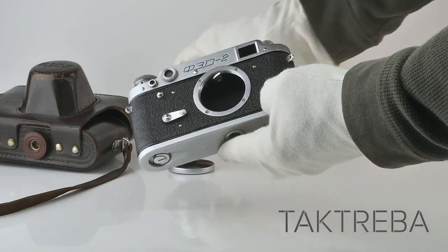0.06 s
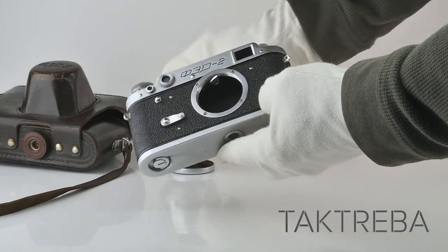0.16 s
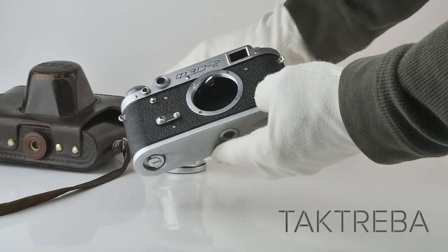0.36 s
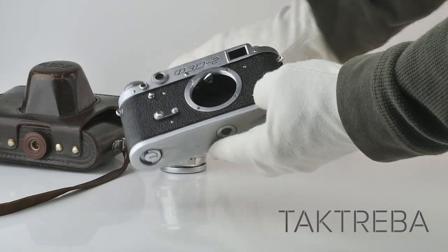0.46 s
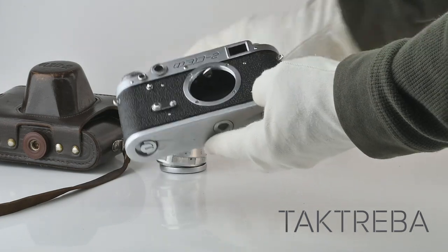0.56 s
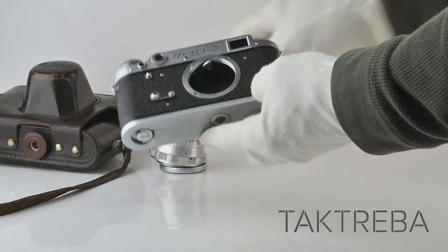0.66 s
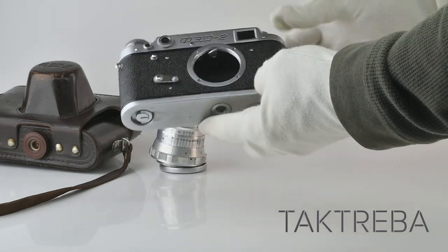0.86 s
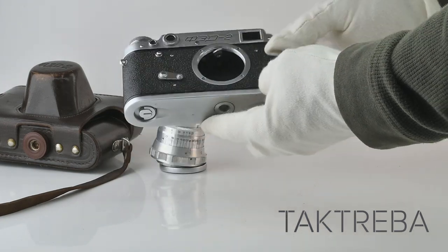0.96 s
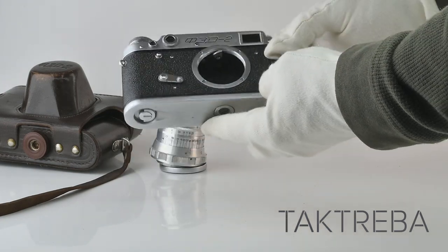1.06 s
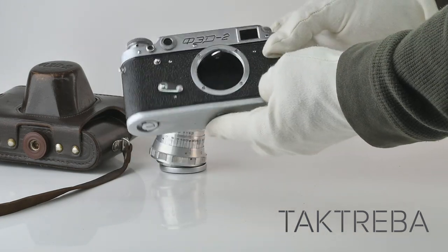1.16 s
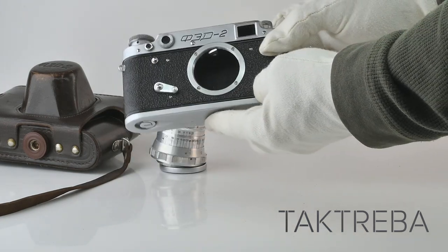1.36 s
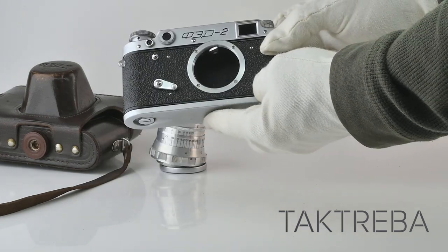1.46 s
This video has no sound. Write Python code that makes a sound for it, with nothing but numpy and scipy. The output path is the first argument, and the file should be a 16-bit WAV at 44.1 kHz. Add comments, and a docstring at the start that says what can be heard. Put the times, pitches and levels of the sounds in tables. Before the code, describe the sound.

One brief, light knock sounds near the start as a handled camera bumps a tabletop, with a slight metallic ring that dies at once. Afterwards only a faint, steady hiss remains in the quiet room.

```python
"""In a small quiet room, a metal camera body held in gloved hands knocks once against a table.
A brief scrape leads into a quick run of contacts. Each impulse excites the damped normal modes of
the table top (a thump) and of the metal shell (a ring, which the glove mutes); the hardest one cracks.
Beneath lie faint low swells from the hands and a hiss with wavering resonances, a fast treble
flutter and a thin whistle that comes and goes."""
import sys
import numpy as np
from scipy import signal
from scipy.fft import rfft, irfft
from scipy.io import wavfile
from scipy.ndimage import map_coordinates

SR = 44100
rng = np.random.default_rng(int(sys.argv[2]) if len(sys.argv) > 2 else 0)


def dump(signal):
    """Clip the signal to [-1, 1] and save it as 16-bit WAV at the path in sys.argv[1]."""
    limited = np.clip(np.atleast_2d(signal).T, -1, 1)
    pcm = np.round(limited * 32767).astype(np.int16)
    wavfile.write(sys.argv[1], SR, pcm)


N = 66150


def undb(db):
    """Amplitude ratio of a level in decibels."""
    return 10 ** (np.asarray(db) / 20)


def unit(x):
    """Normalisation to unit rms."""
    return x / np.sqrt(np.mean(x ** 2))


def pan(db):
    """Intensity panning: two gains for a level difference, left minus right."""
    return undb(np.array([[db], [-db]]) / 2)


def noise(side_db):
    """Partly coherent stereo white noise: a stronger side signal widens it."""
    mid, side = rng.standard_normal((2, N))
    return unit(mid + undb(side_db) * side * np.array([[1], [-1]]))


def colour(x, spectrum):
    """Spectral shaping by (f/Hz, level/dB) points, at unit rms."""
    hz, db = np.array(spectrum).T
    f = np.maximum(np.fft.rfftfreq(N, 1 / SR), 1)
    gain = undb(np.interp(np.log(f), np.log(hz), db))
    return unit(irfft(rfft(x) * gain, N))


def resonate(x, hz, half_width_hz):
    """Resonance as a Lorentzian passband, at unit rms."""
    f = np.fft.rfftfreq(N, 1 / SR)
    return unit(irfft(rfft(x) / (1 + ((f - hz) / half_width_hz) ** 2), N))


def drift(t, per_s):
    """Smooth random modulation with a standard deviation near 1."""
    return map_coordinates(rng.standard_normal(1024), [t * per_s], mode="wrap")


def decay(t, t60):
    """Exponential decay from t = 0, by 60 dB in t60 seconds."""
    return (t >= 0) * np.exp(-np.log(1000) * np.maximum(t, 0) / t60)


def mode(t, hz, t60, attack_s):
    """A normal mode: a damped sinusoid with a gradual onset."""
    return np.sin(2 * np.pi * hz * t) * decay(t, t60) * (1 - np.exp(-t / attack_s)) ** 2


def swells(t, rows):
    """Superposed Gaussian envelopes from (t/s, duration/s, level/dB) rows."""
    return sum(undb(db) * np.exp(-(2 * (t - at) / length) ** 2) for at, length, db in rows)


# Resonances in the hiss: f/Hz, half-width/Hz, level/dB
HISS_RESONANCES = [(918, 36, -78), (1633, 114, -73), (2276, 170, -72), (2898, 160, -70), (3150, 51, -75.5),
                   (3820, 185, -78), (5040, 390, -77.5)]
# Envelope of the band near 3 kHz: t/s, level/dB
UPPER_BAND_LEVELS = [(0, -89), (.1, -71.5), (.5, -64.5), (.58, -64), (.68, -75), (.9, -71), (1, -74.5),
                     (1.23, -64.5), (1.31, -93), (1.4, -71), (1.5, -65)]
# Spectrum of the steady air: f/Hz, relative level/dB
AIR_SPECTRUM = [(20, 0.5), (32, 5), (48, -2), (75, -2), (110, -10.5), (400, -15.5), (700, -11),
                (1200, -3.5), (2000, -4.5), (2700, 3.5), (3400, -5), (4400, -7), (8000, -7), (16000, -24)]

def hiss(t):
    """Filtered noise: a steady broadband floor under narrow bands that waver in level."""
    peaks = sum(undb(db + 3.5 * drift(t, per_s=10.63)) * resonate(noise(side_db=-21), hz, half_width)
                for hz, half_width, db in HISS_RESONANCES)
    upper_db = np.interp(t, *np.array(UPPER_BAND_LEVELS).T)
    upper = undb(upper_db) * resonate(noise(side_db=-21), hz=2950, half_width_hz=230)
    air = undb(-62) * colour(noise(side_db=-5.5), AIR_SPECTRUM)
    return peaks + upper + air


# Course of the flutter: t/s, pulse rate/Hz, level/dB
FLUTTER_COURSE = [(0, 175, -55.5), (.12, 154, -56), (0.278, 167, -58), (.45, 149, -58), (.57, 150, -56.5),
                  (0.801, 143, -59.5), (1.05, 150, -58), (1.23, 142, -58.5), (1.31, 131, -61),
                  (1.4, 155, -58.5), (1.5, 133, -59)]
# Spectrum of the fluttering treble: f/Hz, relative level/dB
FLUTTER_SPECTRUM = [(1500, -13.5), (3000, -5), (4300, -12), (5200, -3.5), (6200, -11), (7450, -1.5),
                    (8600, -12.5), (9750, 2), (10400, -2.5), (11200, 0.5), (12200, -7), (13400, -2.5),
                    (16000, -12)]

def flutter(t):
    """Amplitude modulation: the treble of the hiss comes in fast, slightly uneven pulses."""
    times, rates, levels = np.array(FLUTTER_COURSE).T
    rate = np.interp(t, times, rates) * (1 + 0.02 * drift(t, per_s=20))
    cycles = np.cumsum(rate) / SR
    sharpness, scatter_db, floor = 2.4, 2.5, 0.54
    pulses = np.exp(sharpness * (np.cos(2 * np.pi * cycles) - 1))
    pulses *= undb(scatter_db * drift(t, per_s=140))
    envelope = undb(np.interp(t, times, levels)) * unit(floor + pulses)
    return envelope * colour(noise(side_db=-4), FLUTTER_SPECTRUM) * pan(3.5)


def ripple(x, depth_db=2.5, step_hz=55, full_depth_hz=3500):
    """Spectral ripple: fine, stationary random peaks and dips, deepest in the treble."""
    f = np.fft.rfftfreq(N, 1 / SR)
    contour = map_coordinates(rng.standard_normal(2048), [f / step_hz], mode="wrap")
    db = depth_db * contour * np.minimum(f / full_depth_hz, 1)
    return irfft(rfft(x) * unit(undb(db)), N)


def scrape(t, start_s=0.2085, end_s=0.25):
    """Sliding friction: a band of noise grows louder until the metal catches."""
    progress = np.clip((t - start_s) / (end_s - start_s), 0, 1)
    edges = np.clip(10 * np.minimum(progress, 1 - progress), 0, 1)
    friction = resonate(noise(side_db=-11), hz=1880, half_width_hz=260)
    return edges * undb(-56 + 8.5 * progress) * friction


# Contacts, driving table and shell: t/s, table impulse/dB, shell impulse/dB, push width (sigma)/s
IMPACTS = [(0.2332, -44.5, -70, 0.00038), (.237, -42.5, -50.5, 0.000079), (0.2473, -44, -24, 0.000048),
           (0.2519, -45.5, -36, 0.000042), (0.2549, -56.5, -32.5, 0.0001), (0.2611, -41, -44.5, 0.000091),
           (0.2784, -43.5, -58, 0.00029), (0.33, -46.5, -80, 0.00066), (.3605, -45.5, -47.5, 0.00067)]
# Normal modes of the table top: f/Hz, relative level/dB, T60/s
TABLE_TOP_MODES = [(78, -18.5, 0.5), (156.7, 0, 0.22), (179.6, -0.5, 0.28), (253.5, 1, 0.12),
                   (277.2, -12, 0.36), (327.6, -6, 0.24), (389.5, -5.5, 0.26), (435.6, -12.5, .17),
                   (477, -8, 0.21), (615.6, -4, 0.38), (649, -17, 0.32), (830, 2, 0.069), (894, -6, 0.19),
                   (930, -7, 0.31), (1035, -13.5, 0.2), (1147, -6, 0.071)]
# Dense response between those modes: f/Hz, relative level/dB
BOOM_SPECTRUM = [(30, -37), (70, -26), (100, -32), (135, -10), (175, -14), (230, -8), (400, -0.5),
                 (560, -9.5), (720, -13.5), (900, -8), (1300, -32), (3000, -41)]

def table_thump(t):
    """Forced vibration: force pulses drive the table's modes and boom; a longer push sounds duller."""
    force = np.zeros((1, N))
    for at, db, _, push_s in IMPACTS:
        push = np.exp(-0.5 * ((t - at) / push_s) ** 2)
        force += undb(db) * push / push.sum()
    modes = sum((-1) ** k * undb(db) * mode(t, hz, t60, attack_s=0.00067)
                for k, (hz, db, t60) in enumerate(TABLE_TOP_MODES))
    boom_envelope = undb(-4) * decay(t, t60=0.27) * np.minimum(t / 0.004, 1)
    boom = boom_envelope * colour(noise(side_db=-19), BOOM_SPECTRUM)
    return signal.fftconvolve(force, modes + boom, axes=1)[:, :N]


# Normal modes of the camera shell: f/Hz, relative level/dB, T60/s, left minus right/dB
METAL_MODES = [(1691, -10.5, 0.2, -1), (1747, -2.5, 0.13, 1), (1873, 5, 0.087, -2.5), (1908, -4, 0.27, 7),
               (2001, -2, 0.17, -2), (2104, -1.5, 0.07, -3), (2175, 0, 0.17, -8), (2224, -9, 0.28, 8.5),
               (2250, -15.5, 0.24, 11), (4170, -37, 0.064, 5), (4290, -28, 0.04, -7)]

def shell_ring(t):
    """Impulse response: each contact rings a tight cluster of modes in the metal shell."""
    force = np.zeros((1, N))
    for at, _, db, _ in IMPACTS:
        force += undb(db) * np.sinc((t - at) * SR)
    response = sum(undb(db) * pan(pan_db) * mode(t, hz, t60, attack_s=0.0014)
                   for hz, db, t60, pan_db in METAL_MODES)
    return signal.fftconvolve(force, response, axes=1)[:, :N]


def room(x, t, wet_db, delay_s=0.0058, build_s=0.0041):
    """Reverberation: a short diffuse tail, partly different at each ear, follows the direct sound."""
    age = np.maximum(t - delay_s, 0)
    tail = noise(side_db=-4.5) * decay(age, t60=0.17) * (1 - np.exp(-age / build_s))
    tail = unit(tail) / np.sqrt(N)  # unit energy
    return x + undb(wet_db) * signal.fftconvolve(x, tail, axes=1)[:, :N]


# Spectrum of the contact crack: f/Hz, relative level/dB
CRACK_SPECTRUM = [(500, 9), (2000, -1), (3300, 4), (3900, -8), (4220, 12.5), (4600, -1), (6000, 0),
                  (8000, -1.5), (12000, 3.5), (16000, 0.5)]

def crack(t, at_s=0.2475, attack_s=0.0024):
    """Impact transient: the hardest contact on the shell gives bright noise with a two-stage decay."""
    age = t - at_s
    envelope = decay(age, t60=0.018) + undb(-7) * decay(age, t60=0.15)
    envelope *= np.clip(age / attack_s, 0, 1)
    return undb(-35) * envelope * colour(noise(side_db=-4.5), CRACK_SPECTRUM) * pan(3)


def grip(t, at_s=0.28, closing_s=0.0068, gain_db=-9):
    """Attenuation: the gain of the ring drops as the glove closes on the shell."""
    return undb(gain_db * np.clip((t - at_s) / closing_s, 0, 1))


# Movements of the hands: t/s, duration/s, level/dB
HAND_SWELLS = [(0.393, 0.092, -66), (.57, 0.11, -65.5), (0.764, 0.041, -77)]

def rumble(t):
    """Handling noise: a low, narrow band swells faintly as the hands move the camera."""
    return swells(t, HAND_SWELLS) * resonate(noise(side_db=-13), hz=49, half_width_hz=11.5)


# Swells of the whistle: t/s, duration/s, level/dB
WHISTLE_SWELLS = [(0.628, 0.19, -71), (0.983, 0.078, -66), (1.076, 0.067, -74), (1.417, 0.12, -70)]

def whistle(t):
    """Narrowband noise is heard as pitch: a thin, breathy tone surfaces in the hiss."""
    return swells(t, WHISTLE_SWELLS) * resonate(noise(side_db=-25), hz=934, half_width_hz=22)


def scene():
    """Superposition: the knock in its room, over the hiss."""
    t = np.arange(N) / SR
    thump = room(table_thump(t), t, wet_db=-14.5)
    ring = room(shell_ring(t) * grip(t), t, wet_db=-9)
    knock = thump + ring + crack(t) + scrape(t)
    return knock + ripple(hiss(t) + flutter(t)) + whistle(t) + rumble(t)


def record(dry, cutoff_hz=15850):
    """Band limiting: an elliptic low-pass filter cuts the highest treble steeply."""
    return signal.sosfilt(signal.ellip(10, 0.1, 70, cutoff_hz, fs=SR, output="sos"), dry)


dry = scene()
out = record(dry)
dump(out)
```